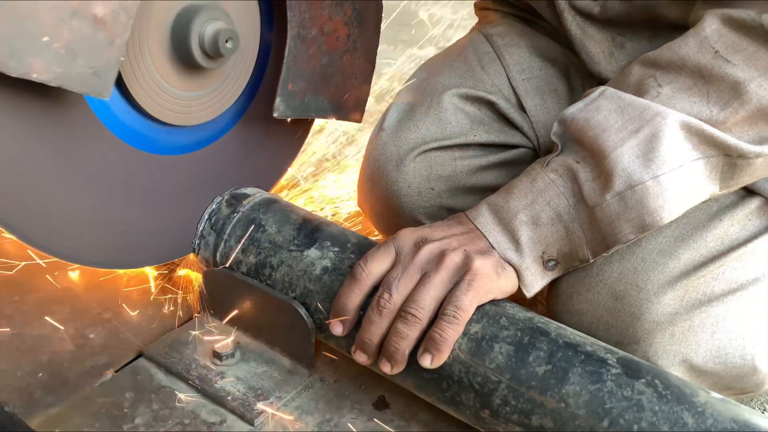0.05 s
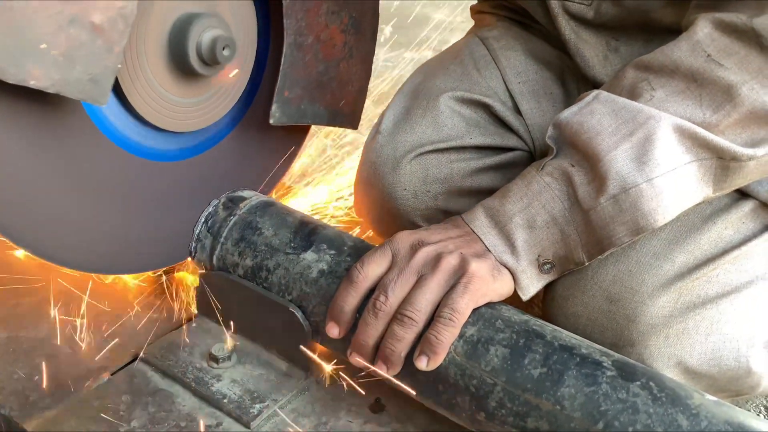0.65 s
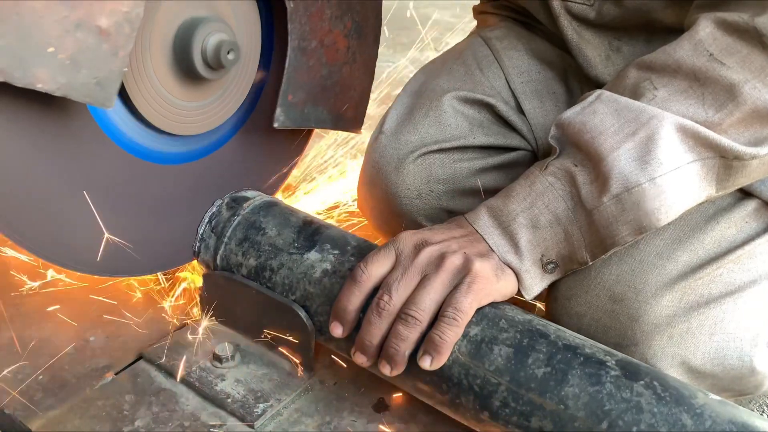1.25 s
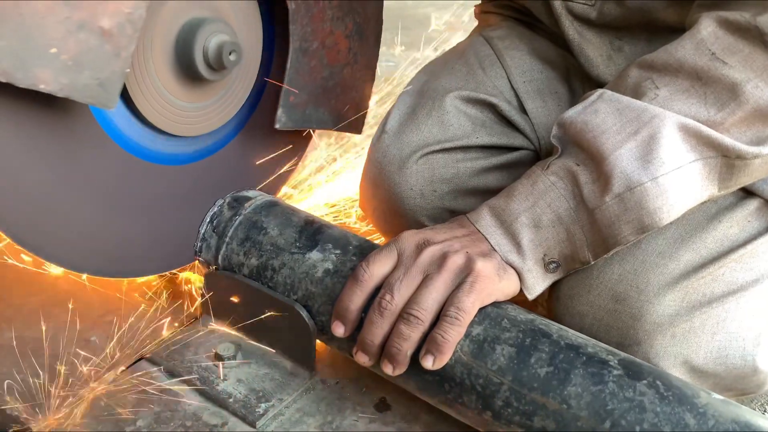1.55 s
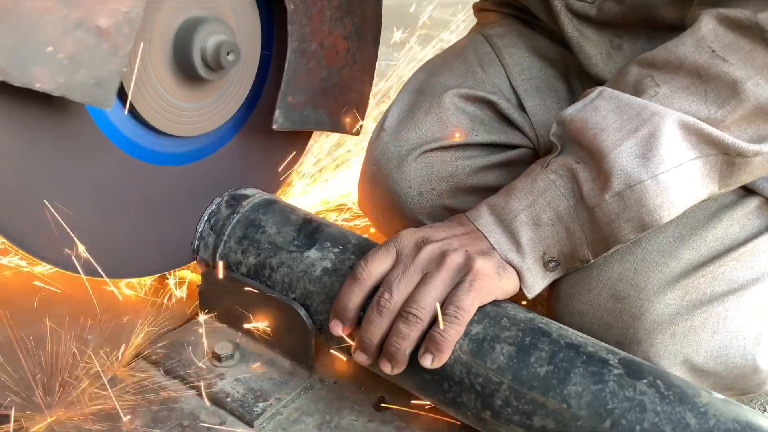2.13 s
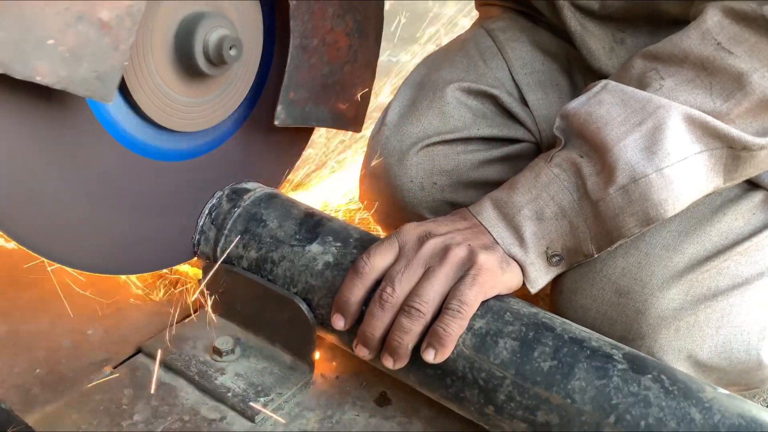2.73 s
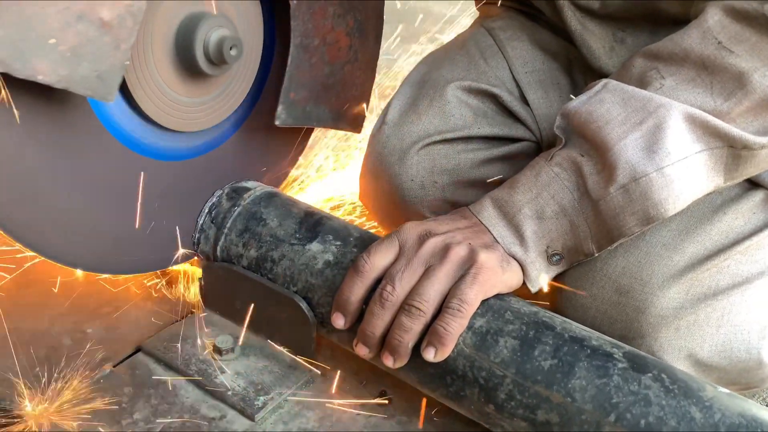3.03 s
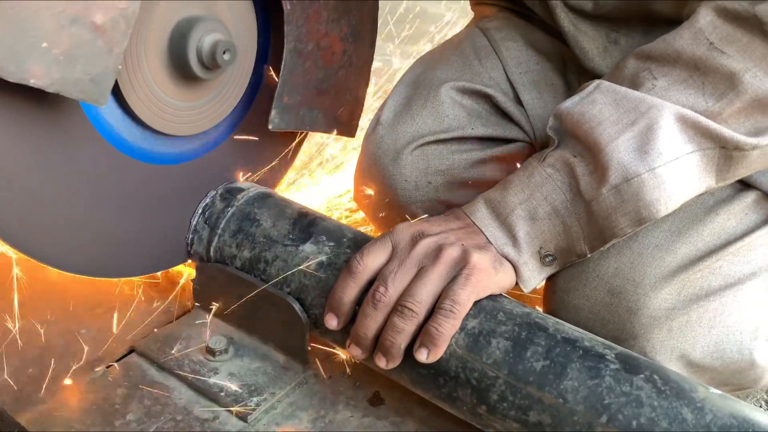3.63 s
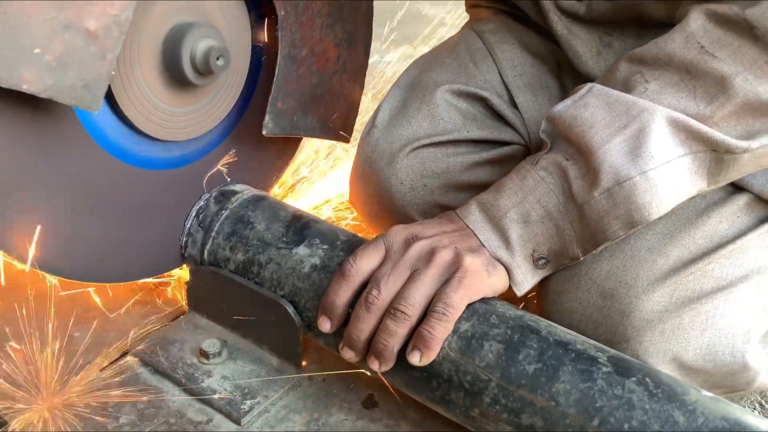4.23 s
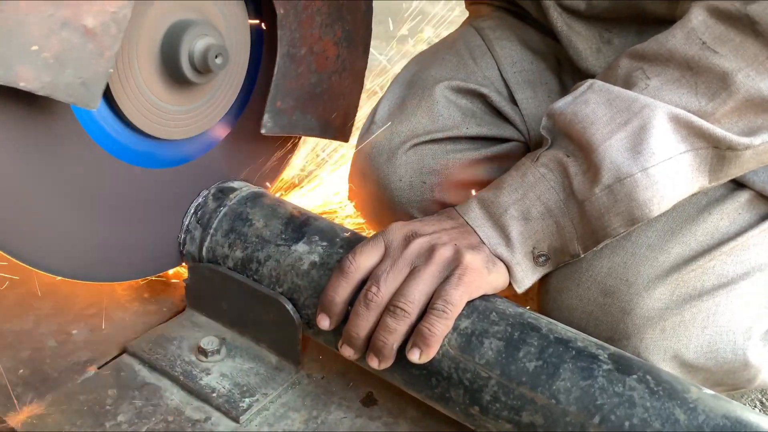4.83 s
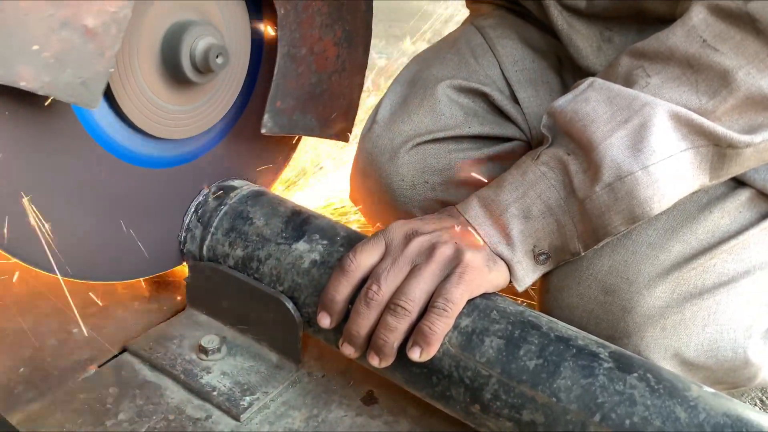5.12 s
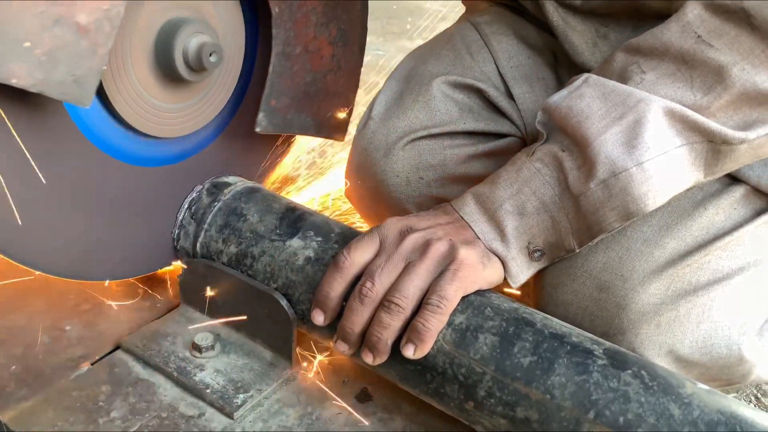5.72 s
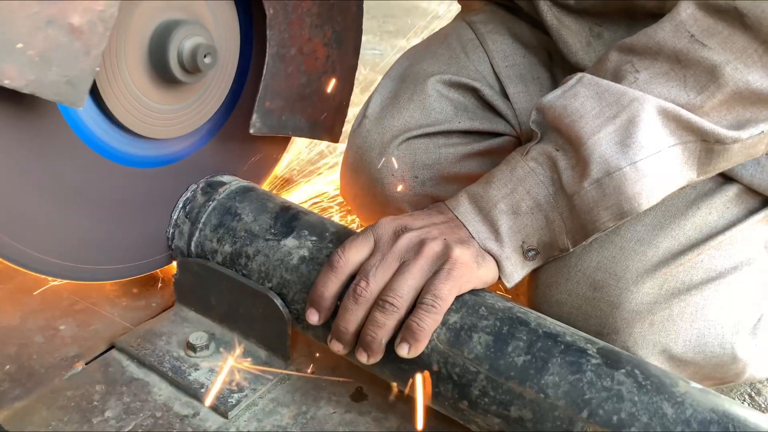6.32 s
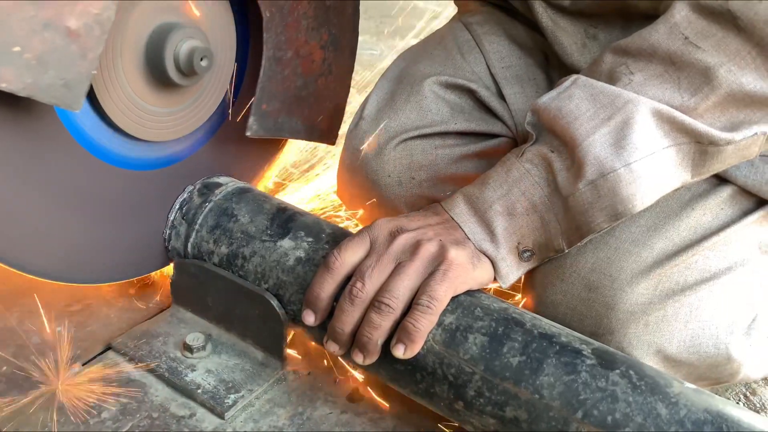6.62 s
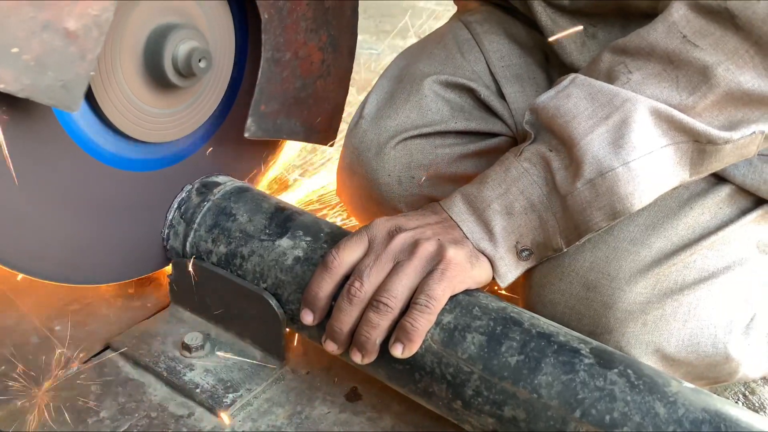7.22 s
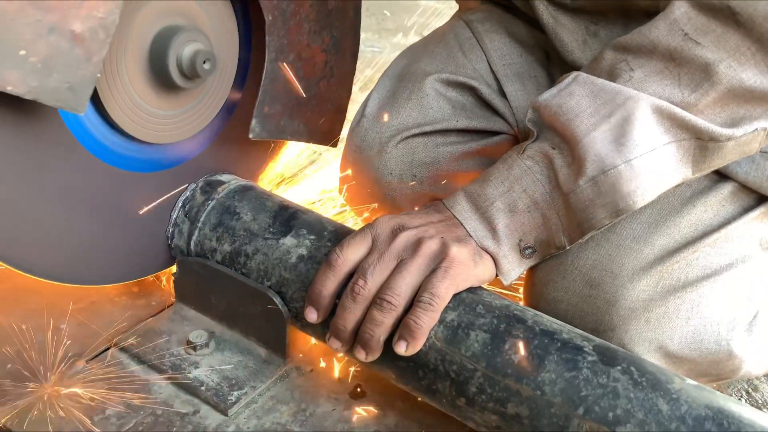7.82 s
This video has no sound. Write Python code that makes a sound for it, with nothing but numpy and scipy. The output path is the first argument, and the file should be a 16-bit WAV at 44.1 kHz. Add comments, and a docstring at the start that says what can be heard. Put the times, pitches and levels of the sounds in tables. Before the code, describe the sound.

A large abrasive wheel grinds continuously through a steel tube, close to the microphone. Its harsh, bright hiss throbs rapidly over a low motor hum, with a ringing metallic rattle and high screeches early on. Near the middle the load briefly eases, the wheel speeds up slightly and the machine drones. The tube then squeals in spurts as cutting continues, and the load eases again at the end.

```python
"""Cut-off wheel through steel tube

A belt-driven abrasive wheel grinds through a steel tube, close up, over the hum of its motor.
High spots on the rim knock on the tube and shake the machine once a turn, and grit tears at the
steel in a hiss that throbs and screeches with the wheel. As the slot deepens, one resonance after
another is caught and the pinched tube squeals. Twice the load eases: the wheel speeds up, the hum
drops and the frame drones."""
import sys
import numpy as np
from scipy import signal
from scipy.fft import rfft, irfft, next_fast_len
from scipy.io import wavfile
from scipy.ndimage import uniform_filter1d, map_coordinates

SR = 44100
rng = np.random.default_rng(int(sys.argv[2]) if len(sys.argv) > 2 else 0)


def put_to_file(sound):
    """Save the sound as 16-bit audio at rate SR, in the file named by the first command-line argument."""
    columns = np.atleast_2d(sound).T  # one column per channel
    safe = np.clip(columns, -1, 1)
    whole_steps = np.round(safe * 32767)
    wavfile.write(sys.argv[1], SR, whole_steps.astype(np.int16))


N = 351036
PORT_LAG_S = .000297  # travel time between the microphone's left and right ports
FADE_S = 0.24
LOADED_HZ, FREE_HZ = 41.46, 41.48  # the load counts as full below these wheel speeds, eased above


def undb(db):
    """Decibels to gain."""
    return 10 ** (np.asarray(db) / 20)


def unit(x):
    """Scale to a spread of 1."""
    return x / np.std(x)


def cut(x, hz, kind, order=4):
    """Butterworth low-pass or high-pass."""
    return signal.sosfilt(signal.butter(order, hz, kind, fs=SR, output="sos"), x)


def swell(x, hz, width_hz, db):
    """Boost or dip one resonance; the gain may move over time."""
    ring = signal.lfilter(*signal.iirpeak(hz, hz / width_hz, fs=SR), x)
    return x + (undb(db) - 1) * ring


def curve(table):
    """Join rows of (seconds, value) with straight lines."""
    return np.interp(np.arange(N) / SR, *np.transpose(table))


def spell(start_s, end_s, fade_s=FADE_S):
    """An envelope from 0 to 1: fade in, hold, fade out."""
    t = np.arange(N) / SR
    return np.clip(.5 + np.minimum(t - start_s, end_s - t) / fade_s, 0, 1)


def wander(rate_hz):
    """Smooth random modulation with a spread of 1."""
    count = int(N / SR * rate_hz) + 3
    t = np.linspace(0, N / SR, 8192)
    walk = map_coordinates(rng.standard_normal(count), [t * rate_hz], order=3, mode="nearest")
    return unit(np.interp(np.arange(N) / SR, t, walk))


def pan(left_db):
    """Stereo gains that put the left channel this far above the right."""
    return undb(np.array([[left_db], [-left_db]]) / 2)


def ports(x, direction):
    """A source on the left (+1) or right (-1) reaches the nearer microphone port first."""
    size = next_fast_len(N + SR // 100)
    hz = np.fft.rfftfreq(size, 1 / SR)
    delay = PORT_LAG_S * np.array([[1 - direction], [1 + direction]]) / 2
    return irfft(rfft(x, size) * np.exp(-2j * np.pi * hz * delay), size)[:, :N]


def scatter(direction, scatter_db):
    """White noise of unit density: a direct part, and a scattered part that differs left and right."""
    direct = ports(rng.standard_normal(N), direction)
    scattered = undb(scatter_db) * rng.standard_normal((2, N))
    return unit(direct + scattered) * np.sqrt(SR / 2)


def harmonic(turns, multiple, direction):
    """A stereo sine at one multiple of the wheel speed, rms 1."""
    lead_turns = direction * PORT_LAG_S * LOADED_HZ * np.array([[1], [-1]]) / 2
    return np.sqrt(2) * np.sin(2 * np.pi * (multiple * (turns + lead_turns) + rng.random()))


# The wheel's pace. Each row: time in seconds, turns per second.
WHEEL_SPEED = [(0.09, 40.44), (0.31, 40.81), (0.99, 40.44), (1.19, 40.11), (1.71, 40.58), (1.95, 40.25),
               (2.27, 40.35), (2.45, 40.67), (3.15, 40.61), (3.29, 40.74), (3.39, 41.8), (3.43, 41.99),
               (3.83, 42.43), (4.07, 42.15), (4.21, 40.9), (4.37, 40.28), (4.47, 40.15), (4.93, 40.88),
               (5.25, 40.44), (5.69, 40.53), (5.99, 41.02), (6.27, 41.13), (6.49, 40.72), (6.83, 41.11),
               (7.61, 40.99), (7.65, 41.09), (7.73, 41.86), (7.85, 42.38)]


def wheel_speed():
    """Turns per second: the wheel sags under load and picks up when it eases."""
    return curve(WHEEL_SPEED)


# Drive on each named part. Each entry: starting drive in dB, drift in dB per second, step in dB
# when the load eases.
PART_DRIVE = {"base": (0.7, -0.7, -1.2), "frame": (-5, 1, 1.4), "guard": (2.2, -0.77, 1.6),
              "tube": (0.27, 0.56, -2), "motor": (-46.5, 0.19, -5)}


def shake(part):
    """How hard a part is driven, in dB, following the depth of the slot and the load."""
    start_db, db_per_s, eased_db = PART_DRIVE[part]
    eased = np.clip((wheel_speed() - LOADED_HZ) / (FREE_HZ - LOADED_HZ), 0, 1)
    return start_db + db_per_s * np.arange(N) / SR + eased_db * eased


# Partials of the hum. Each row: multiple of the shaft speed, level in dB relative to the motor's drive.
SHAFT_ORDERS = [(1, -12), (2, 2.5), (3, -5.5), (4, -10.5), (5, -16.5), (6, -12), (7, -14.5)]


def motor(turns, belt_slip=0.016, beat_db=-13):
    """The shaft hums over a low rumble, louder under load; the slower wheel beats with its third order."""
    shaft = turns * (1 + belt_slip)
    hum = undb(beat_db) * np.sin(2 * np.pi * 3 * turns)
    for multiple, db in SHAFT_ORDERS:
        gain = undb(db + 0.24 * wander(36))  # the load trembles
        hum = hum + gain * np.sin(2 * np.pi * (multiple * shaft + rng.random()))
    hum = ports(hum, direction=0.41) * undb(shake("motor")) * pan(left_db=-3.5)
    rumble = cut(cut(scatter(direction=0.66, scatter_db=-1), 40, "high"), 122, "low")
    return hum + undb(-83) * rumble


# Spells of frame drone. Each row: start and end in seconds, pitch in Hz, level in dB.
FRAME_DRONES = [(2.9, 3.4, 488, -47), (3.35, 4.25, 481, -42), (6.7, 7.7, 468, -44), (7.62, 8.2, 479, -42)]


def drone():
    """The frame hums at a wavering pitch of its own, loudest around the moments the load eases."""
    out = 0
    for start_s, end_s, hz, db in FRAME_DRONES:
        phase = 2 * np.pi * np.cumsum(hz + 3 * wander(4) + 3.5 * wander(70)) / SR
        out = out + spell(start_s, end_s) * undb(db + 1.3 * wander(25)) * np.sin(phase)
    return pan(left_db=9) * ports(out, direction=0.77)


# Wheel harmonics sitting on a resonance of frame, guard or tube. Each row: start and end in seconds,
# multiple of the wheel speed, level in dB, left over right in dB, direction from -1 right to 1 left.
WHEEL_WHINES = [(-0.8, 0.67, 17, -56, 13, -0.3), (0.4, 0.69, 21, -56, 4, 0.48),
                (-1, 0.96, 14, -51, 9.5, 0.55), (1, 2.07, 17, -61, 14, -0.087),
                (0.1, 2.5, 26, -56.5, 8, 0.67), (0.9, 3.2, 29, -48, 0.5, 1),
                (0.84, 1.47, 25, -54, 11, 0.49), (1.35, 3.12, 25, -56, 9, 0.59), (1, 2.2, 13, -53, 8, 0.67),
                (1.5, 3.17, 13, -47.5, 10.5, 0.73), (3, 5.85, 13, -49, 7, 0.96), (3, 4.1, 17, -60, 10, 0.1),
                (3.35, 4.1, 23, -59, 8, 0.4), (4.22, 4.63, 25, -53.5, 7, 0.31),
                (3.3, 7.65, 24, -56, 3, 0.7), (4.15, 4.65, 29, -45.5, 0, 1), (4.65, 5.95, 29, -45, 0.5, 1),
                (6.2, 6.75, 29, -47, 4, 1), (6.75, 7.65, 29, -48, 1, 1), (5.85, 8.2, 13, -45, 10, 1),
                (5.9, 7.7, 23, -62, 6, 0.7), (7.7, 8.1, 17, -51.5, 3, 0.53), (6, 8.7, 28, -50, 3, 1),
                (-1.5, 2.93, 44, -57, 1, -0.3), (-1, 1.5, 87, -50, 8, 0.023), (3.5, 4.15, 114, -44.5, 2, 0)]


def whines(turns, flutter_db=2.3, waver_turns=.0016):
    """Clear tones that rise and sag with the wheel, each while it drives a resonance."""
    out = 0
    for start_s, end_s, multiple, db, left_db, direction in WHEEL_WHINES:
        depth_db = min(multiple / 29, 1) * flutter_db  # the heavy frame's low tones flutter less
        gain = spell(start_s, end_s, fade_s=0.1) * undb(db + depth_db * wander(28))
        shaken = turns + waver_turns * wander(45)  # the wheel trembles, roughening high whines most
        out = out + gain * pan(left_db) * harmonic(shaken, multiple, direction)
    return out


# The slot pinches the wheel. Each row: start and end in seconds, multiple of the wheel speed, level in dB.
PINCH_SQUEALS = [(1.985, 2.33, 54, -51), (2.954, 3.402, 53, -53.5), (4.208, 4.347, 53, -42.5),
                 (4.407, 4.54, 54, -45), (4.607, 4.918, 53, -44), (4.922, 5.064, 53, -47.5),
                 (5.037, 5.232, 53, -43), (5.267, 5.647, 53, -44.5), (5.7, 5.886, 53, -45),
                 (6.408, 6.622, 53, -49)]


def squeals(turns):
    """The pinched tube sings in spurts, locked to a wheel harmonic and trembling as the rim rubs."""
    rubbed = turns + .0017 * wander(55)
    out = 0
    for start_s, end_s, multiple, db in PINCH_SQUEALS:
        gain = undb(db) * spell(start_s, end_s, fade_s=0.1)
        out = out + gain * harmonic(rubbed, multiple, direction=0)
    return out * undb(1.7 * wander(36))


# High spots that knock until they wear off. Each row: start and end in seconds, place in the turn
# from 0 to 1, ring pitch in Hz, typical peak in dB.
RIM_KNOCKS = [(0.35, 0.95, 0.22, 3630, -29), (0.48, 0.978, 0.28, 3550, -24.5),
              (0.98, 1.584, 0.27, 3550, -30), (4.2, 7.702, 0.21, 3650, -37.5), (4.39, 7.7, 0.53, 3687, -38),
              (4.3, 6.2, 0.95, 3520, -42)]


def knocks(turns, rise_s=.0004, decay_s=.0018, tail_s=.008, tail_db=-12):
    """Each high spot strikes the lip of the slot once a turn, and the tube wall rings briefly."""
    speed, out = wheel_speed(), 0
    for start_s, end_s, place, hz, db in RIM_KNOCKS:
        age_s = (turns - place) % 1 / speed
        attack = 1 - np.exp(-age_s / rise_s)
        decay = np.exp(-age_s / decay_s) + undb(tail_db) * np.exp(-age_s / tail_s)
        ring = attack * decay * np.sin(2 * np.pi * hz * age_s)
        out = out + undb(db) * spell(start_s, end_s) * ring / ring.max()
    return out * undb(1.2 * wander(30))


# Rough patches of the rim. Each row: start and end in seconds, place in the turn from 0 to 1, length
# in turns, pitch in Hz, creep in Hz per second, level in dB, direction from -1 right to 1 left.
RIM_SCREECHES = [(-.1, 1.3, .45, 1, 9380, 115, -38, 1), (1.3, 3.35, .48, .45, 9580, 100, -32.5, 1),
                 (.5, 1.5, .73, .55, 9960, 60, -33.5, 1), (1.5, 2.75, .69, .55, 10080, -40, -31.5, 1),
                 (2.7, 3.35, .58, .55, 10050, 40, -33, 1), (.8, 2.8, .22, .4, 10290, -20, -33.5, 1),
                 (.4, 2.9, .27, .55, 7790, -15, -39, .8), (.3, 3.2, .5, 1, 8850, -20, -39, 1),
                 (1.4, 3.4, .25, .9, 4790, 30, -40, 0), (2.1, 3.4, .9, .7, 3500, 0, -37.5, 1),
                 (2.1, 3.4, .36, .7, 3520, -10, -38, 1), (.45, 1.65, .31, .5, 3560, -25, -32, 1),
                 (4.5, 5.15, .45, .8, 10020, 90, -37, 1), (4.2, 7.7, .4, 1, 4830, 0, -43, 0),
                 (5.3, 6.7, .2, .7, 10580, 130, -36.5, 1), (5.9, 7.7, .42, 1, 3700, 12, -39, .9),
                 (6.1, 7.7, .35, .9, 7460, -20, -41, .9)]


def screeches(turns, waver_cycles=.13, flutter_db=1.6):
    """Each patch rubs a short screech out of the steel once a turn; its pitch creeps as the cut deepens."""
    t, speed, out = np.arange(N) / SR, wheel_speed(), np.zeros((2, N))
    for start_s, end_s, place, length, hz, creep, db, direction in RIM_SCREECHES:
        on = (t > start_s - FADE_S) & (t < end_s + FADE_S)
        angle = (turns[on] - place + .5) % 1 - .5  # turns from the middle of the patch
        contact = np.cos(np.pi * np.clip(angle / length, -.5, .5)) ** 2
        pitch_hz = hz + creep * (t[on] - start_s)
        cycles = pitch_hz * angle / speed[on] + waver_cycles * wander(25)[on]
        gain = spell(start_s, end_s)[on] * contact * undb(db + flutter_db * wander(40)[on])
        lead_cycles = direction * PORT_LAG_S * hz * np.array([[1], [-1]]) / 2
        out[:, on] += np.sqrt(2) * gain * np.sin(2 * np.pi * (cycles + lead_cycles))
    return out


def rim(turns, wear_s, patchy_db, harmonics):
    """Bumps around the rim, met again on every turn; wear slowly shifts and resizes each harmonic."""
    shape = (int(turns[-1]) + 2, harmonics)  # one row per turn
    life_turns = wear_s * turns[-1] * SR / N
    phase = 2 * np.pi * rng.random(harmonics)
    phase = phase + np.cumsum(rng.standard_normal(shape), axis=0) / np.sqrt(life_turns)
    db = patchy_db * unit(uniform_filter1d(rng.standard_normal(shape), size=30, axis=0))
    bumps = irfft(np.pad(undb(db) * np.exp(1j * phase), ((0, 0), (1, harmonics))), axis=1)
    return unit(map_coordinates(bumps.ravel(), [turns * bumps.shape[1]], order=3, mode="nearest"))


def rim_force(turns, harmonics=64):
    """The rim's bumps push on the tube: a buzz of wheel harmonics over a loose rattle."""
    bandwidth_hz = harmonics * turns[-1] * SR / N
    buzz = rim(turns, wear_s=0.76, patchy_db=3.0, harmonics=harmonics) * np.sqrt(bandwidth_hz)
    buzz = swell(buzz, hz=510, width_hz=170, db=-11)
    buzz = swell(buzz, hz=1175, width_hz=80, db=-5)
    rattle = cut(scatter(direction=0.76, scatter_db=7.5), 175, "high")
    force = undb(-2.5) * ports(buzz, direction=0.68) + undb(-2.0) * rattle
    force = swell(force, 211, 77, shake("base"))
    force = swell(force, 526, 93, 1.1 * shake("frame") - 3)
    force = swell(force, 697, 86, shake("guard") - 2)
    force = swell(force, 950, 87, 0.15 * shake("tube") - 1.5)
    force = swell(force, 1185, 70, -2)
    force = swell(force, 2370, 220, 1.5 * shake("tube") - 1)
    return cut(cut(force, 144, "high"), 2610, "low")


def circulate(x, echo_db, drift_s, count=7):
    """Waves run round tube and wheel and return; their paths creep as the slot deepens."""
    n, echoes = np.arange(N), 0
    for path_s in np.geomspace(.002, .009, count):
        lag = SR * (path_s * (1 + .1 * rng.random()) + drift_s * wander(.45))
        read_at = n - np.round(lag * 8) / 8
        echoes = echoes + np.array([np.interp(read_at, n, channel) for channel in x])
    share = undb(echo_db)
    return (x + share * echoes / np.sqrt(count)) / np.sqrt(1 + 1.58 * share ** 2)


# How fast steel comes off, as a fader ride on the hiss. Each row: time in seconds, level in dB
# (only the swing about its mean counts).
CUT_RATE = [(0.05, -25), (0.7, -26.5), (2.26, -27.5), (3.11, -27.5), (4.29, -28.5), (5.34, -28),
            (5.43, -28.5), (7.68, -28), (7.9, -27)]
# The once-a-turn bite of the highest spot. Each row: time in seconds, accent in dB, of which each
# band of grit takes a share.
HIGH_SPOT_BITE = [(0, 0), (.7, 6), (1.5, 3), (2.3, 3.5), (4, 1), (5.2, 2.5), (7.96, 2)]


def grinding(turns, harmonics=360, rough_db=1.25, repeat_share=0.66, high_spot_turn=.3):
    """Countless grains tear off chips, harder where the rim stands high; many return on every turn."""
    cut_db = curve(CUT_RATE) - np.mean(curve(CUT_RATE))
    bite_db = curve(HIGH_SPOT_BITE)
    runout = np.sqrt(2) * np.cos(2 * np.pi * (turns - .42) + 0.2 * wander(1.52))  # wheel out of round
    high_spot = np.exp(3.5 * (np.cos(2 * np.pi * (turns - high_spot_turn)) - 1))
    bandwidth_hz = harmonics * turns[-1] * SR / N
    pattern = rim(turns, wear_s=0.6, patchy_db=2.5, harmonics=harmonics) * np.sqrt(bandwidth_hz)

    def track(rough, bite, direction, scatter_db):
        """Returning and fresh grains on one track of the rim; the feed keeps their mean power steady."""
        height = unit(0.6 * runout + rim(turns, wear_s=1.3, patchy_db=3, harmonics=12))
        throb = undb(rough * rough_db * height + bite * bite_db * high_spot)
        returning = np.sqrt(repeat_share) * ports(pattern, direction)
        fresh = np.sqrt(1 - repeat_share) * scatter(direction, scatter_db)
        return (returning + fresh) * throb / np.sqrt(uniform_filter1d(throb ** 2, size=4340))

    edge = track(rough=.6, bite=.35, direction=.8, scatter_db=0)
    edge = cut(cut(edge, 3180, "high"), 3900, "low", order=8)
    hiss = track(rough=.7, bite=.22, direction=1, scatter_db=9)
    hiss = swell(hiss, 4826, 63, 6.1)  # the tube wall rings brightly
    hiss = cut(cut(hiss, 3840, "high", order=8), 8760, "low", order=8)
    sizzle = track(rough=.85, bite=.15, direction=-1, scatter_db=-4)  # sparks leave to the right
    sizzle = swell(cut(sizzle, 8930, "high", order=8), 10200, 830, 3.9)
    grit = (edge * undb(0.046 * cut_db - 6.0)
            + hiss * undb(cut_db - 0.55)
            + sizzle * undb(1.3 * cut_db + 0.6))
    return circulate(grit, echo_db=-6.5, drift_s=.00003)


# Passing resonances. Each row: start and end in seconds, centre in Hz, width in Hz, boost or dip in dB.
SLOT_RESONANCES = [(-0.2, 0.35, 6120, 150, 5.5), (0.0, 4.7, 1800, 70, 3), (0.0, 0.82, 3880, 80, 4.5),
                   (0.448, 1.5, 3580, 70.5, 6.5), (0.7, 2.6, 270, 90, 3.5), (1.7, 4.1, 6750, 90, 3),
                   (0.9, 3.6, 4000, 700, -1), (2.15, 4.5, 3500, 54.6, -0.5), (2.5, 4.3, 6270, 130, 6.5),
                   (4.4, 5.6, 3700, 72, 5), (4.6, 6.8, 6400, 300, 3.5), (3.4, 8.2, 8350, 900, -3),
                   (5.95, 7.8, 3720, 54.4, 4.5), (6.0, 7.65, 700, 100, -5), (5.899, 6.6, 545, 69.4, -1),
                   (6.6, 8.1, 6130, 300, 4.5)]


def deepening_slot(force):
    """As the slot deepens, one resonance after another swells or sinks, holds and lets go."""
    for start_s, end_s, hz, width_hz, db in SLOT_RESONANCES:
        force = swell(force, hz, width_hz, db * spell(start_s, end_s))
    return force


# The broad EQ of the grinding. Each row: frequency in Hz, gain in dB.
GRIND_EQ = [(130, -66), (220, -68.5), (330, -78.5), (600, -77.5), (780, -87.5), (950, -78), (1400, -80),
            (2800, -81.5), (3300, -64), (5200, -73), (8500, -64), (10500, -78), (13500, -68),
            (15500, -93.5)]
# Peaks and dips that colour the grinding, left and right. Each row: centre in Hz, width in Hz (played
# no narrower than 45), left gain in dB, right gain in dB.
GRIND_PEAKS = [(267, 79, 5.5, 2.5), (475, 90.5, 17.5, 9.5), (547.5, 64, 16, 7), (696.6, 41, 12.5, 10),
               (989, 39, 7.5, 4.5), (1171.5, 48, 13, 14.5), (1261, 23, 2, 2), (1770, 67, 9.5, 8.5),
               (1951, 29.0, 9.5, 12), (2155, 29, 15, 14.5), (2497, 37, 13, 14.5), (3000, 130, 14.5, 11),
               (3554, 35.0, -6, 14), (3510, 37, 3.5, -8), (3645, 510, 5.5, -1), (3980, 81, 7, 0),
               (4214, 65, 6, 2), (4640, 180, 5.5, 0.5), (4965, 197, -12.5, 8), (5530, 180, 9, 2.5),
               (5970, 260, 4.5, 6.5), (6590, 190, -6.5, 6), (7040, 44, 0, -6), (7300, 200, 1.5, -4),
               (10190, 1200, 3, 9), (10810, 370, 13, -0.5)]


def colour(force):
    """A broad EQ with ringing peaks and dips gives the grinding its tone, different left and right."""
    hz = np.fft.rfftfreq(8192, 1 / SR)[:, None] + 1
    eq_hz, eq_db = np.transpose(GRIND_EQ)
    db = np.interp(np.log(hz), np.log(eq_hz), eq_db)
    for centre, width, left_db, right_db in GRIND_PEAKS:
        db = db + np.array([left_db, right_db]) / (1 + (2 * (hz - centre) / max(width, 45)) ** 2)
    # folding the cepstrum makes each peak ring after the push, never before
    cepstrum = irfft(np.log(undb(db.T)))
    half = cepstrum.shape[1] // 2
    cepstrum = cepstrum * np.r_[1, np.full(half - 1, 2), 1, np.zeros(half - 1)]
    response = irfft(np.exp(rfft(cepstrum)))
    size = next_fast_len(N + SR // 4)
    return irfft(rfft(force, size) * rfft(response, size), size)[:, :N]


def scene():
    """One wheel speed drives buzz, hiss, knocks, screeches, whines, squeals and hum; the frame drones."""
    turns = np.cumsum(wheel_speed()) / SR
    force = rim_force(turns) + grinding(turns)
    grind = colour(deepening_slot(force))
    cutting = grind + knocks(turns) + screeches(turns) + whines(turns) + squeals(turns)
    return cutting + drone() + motor(turns)


def record(dry, top_hz=15500):
    """A steep low-pass takes off the very top."""
    return signal.sosfilt(signal.ellip(8, .2, 70, top_hz, fs=SR, output="sos"), dry)


dry = scene()
out = record(dry)
put_to_file(out)
```